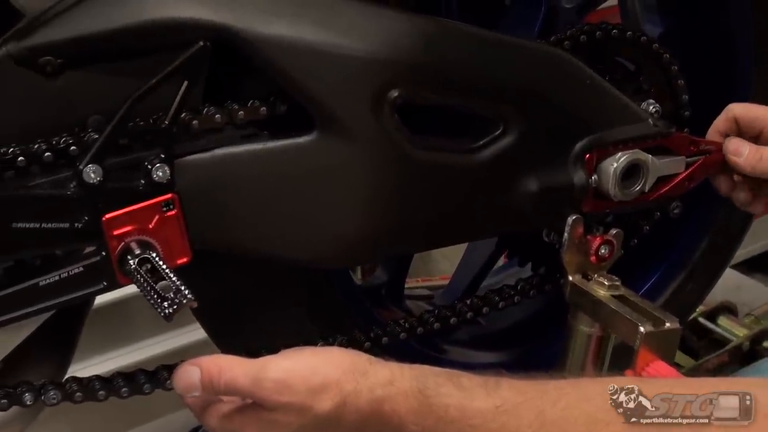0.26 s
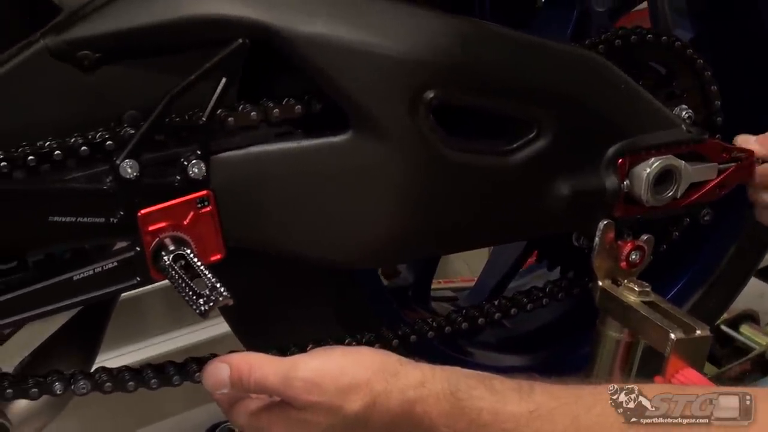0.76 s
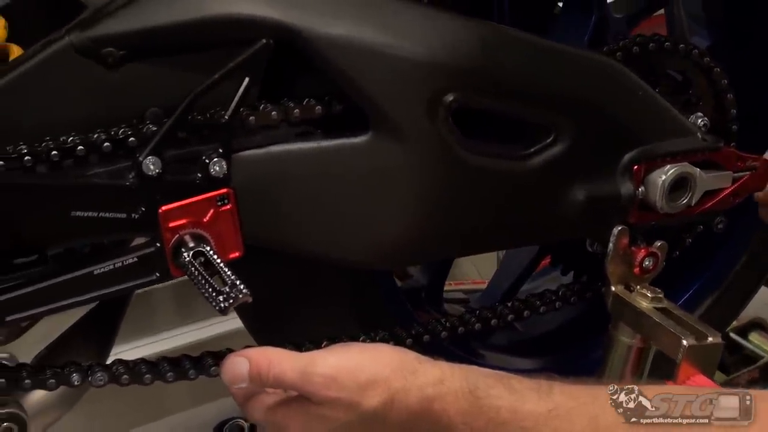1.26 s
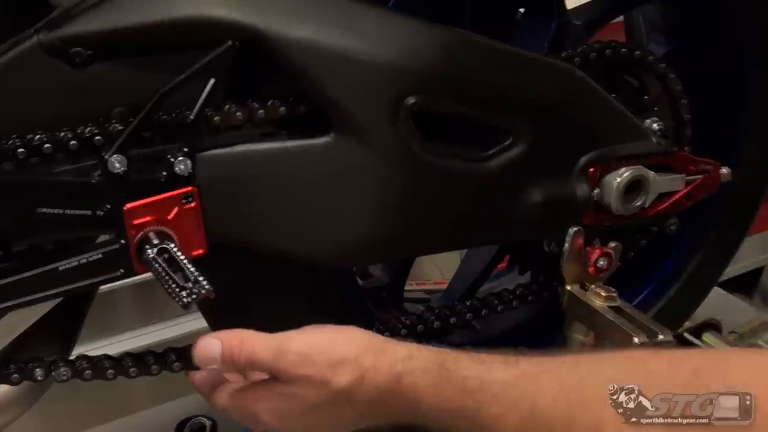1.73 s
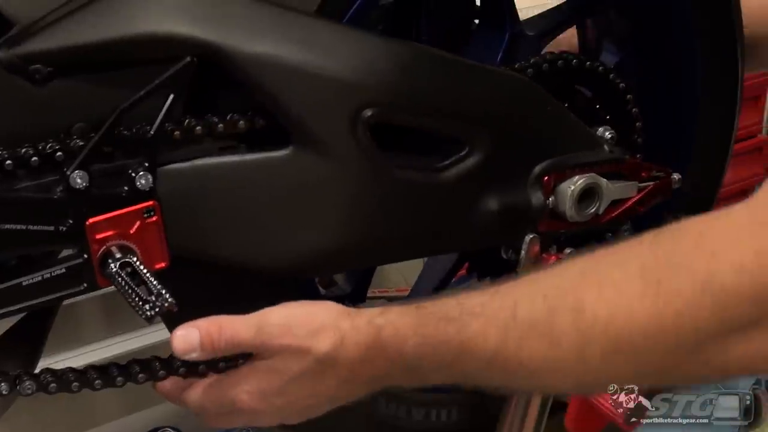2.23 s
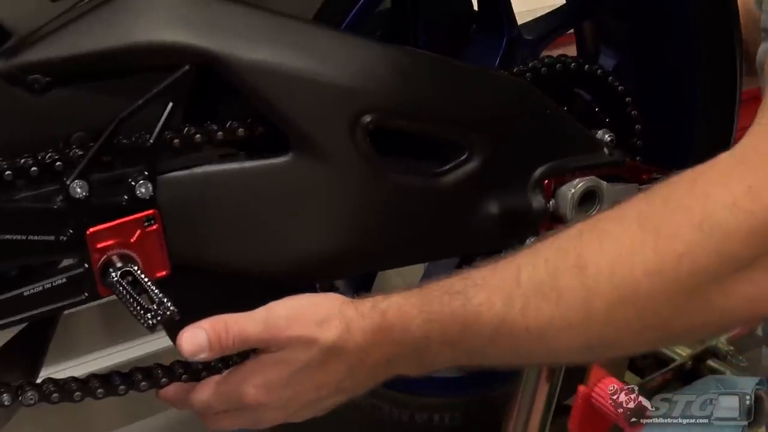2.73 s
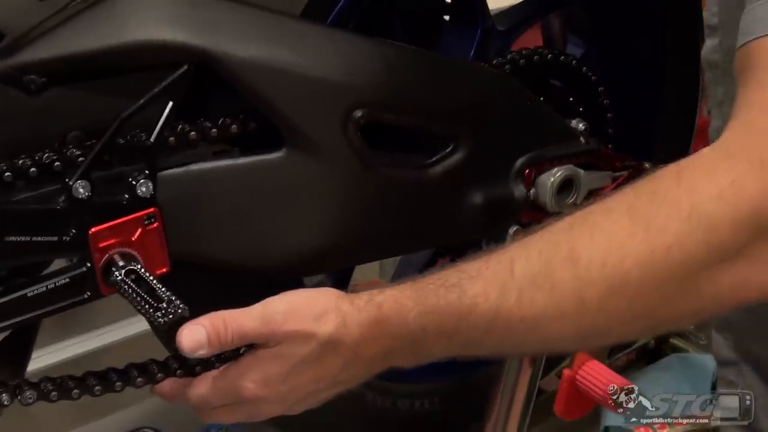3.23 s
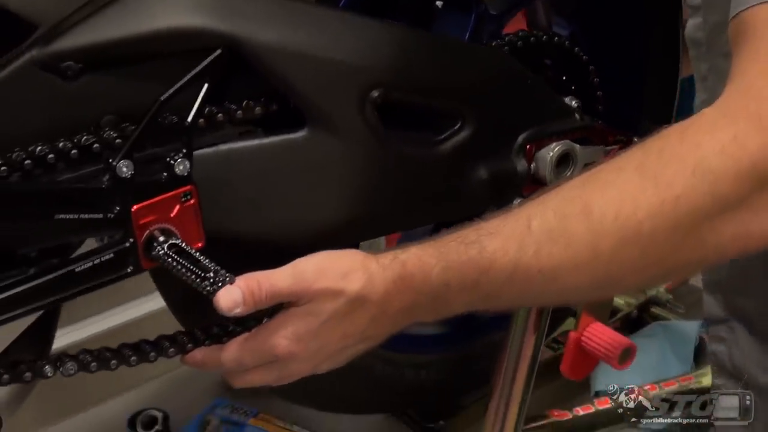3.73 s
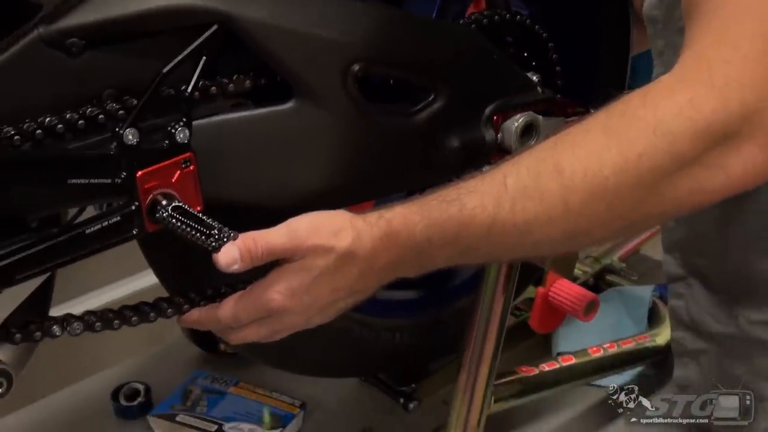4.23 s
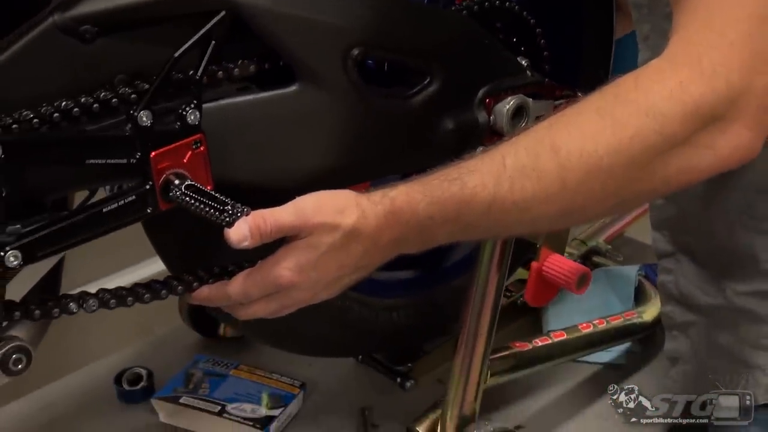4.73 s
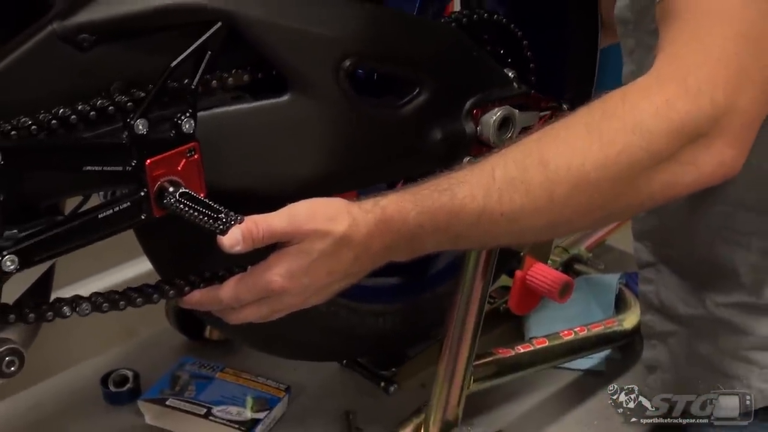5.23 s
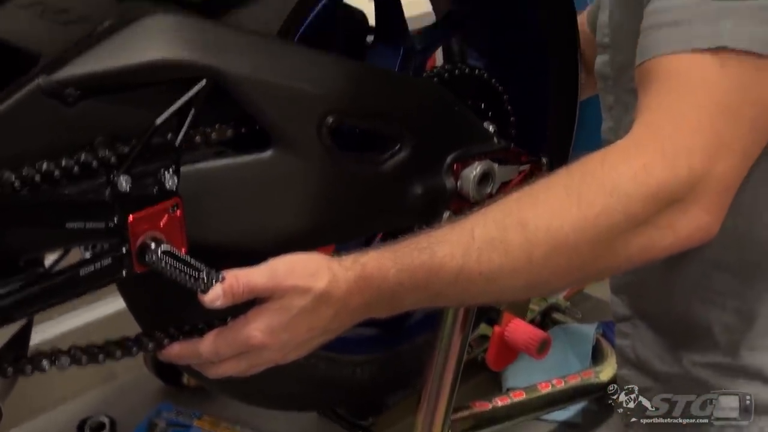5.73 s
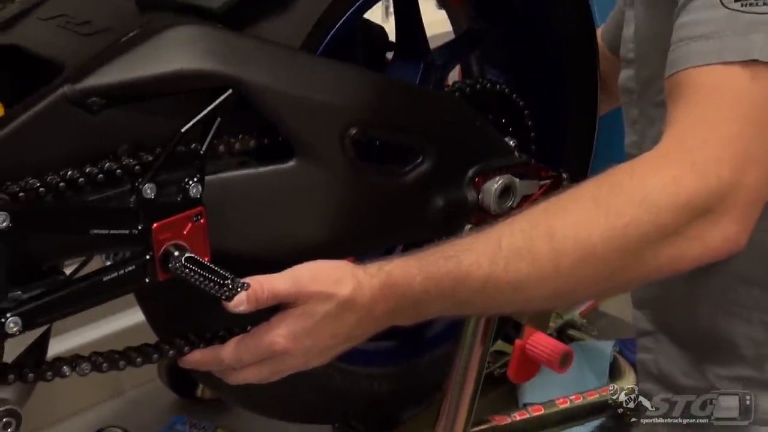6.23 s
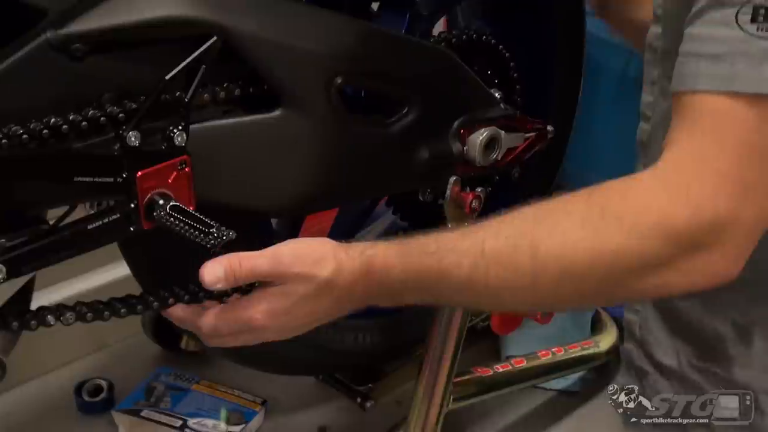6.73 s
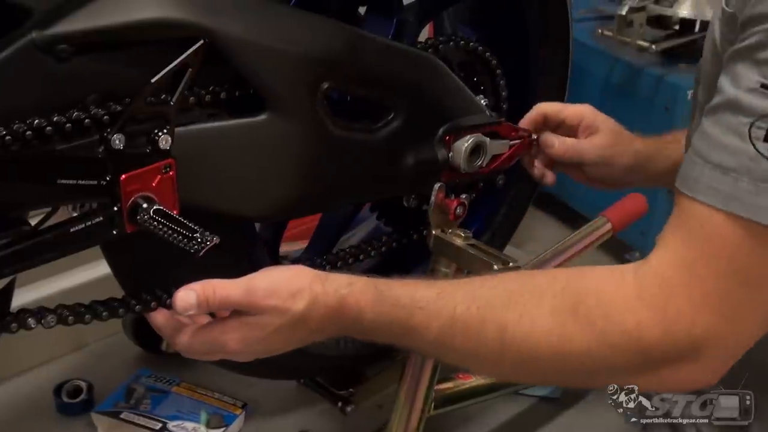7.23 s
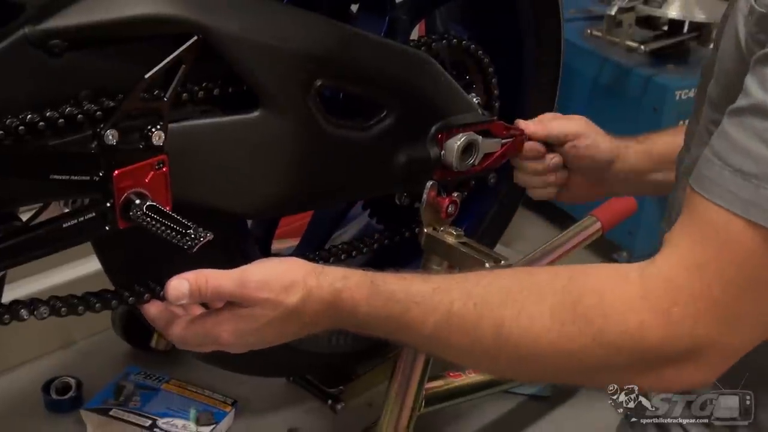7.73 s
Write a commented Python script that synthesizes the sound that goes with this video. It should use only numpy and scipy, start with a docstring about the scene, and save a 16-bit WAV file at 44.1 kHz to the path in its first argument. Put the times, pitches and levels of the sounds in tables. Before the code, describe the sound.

Close up in a reverberant workshop, four quick steel clinks sound as a tool strikes a motorcycle's rear axle fitting. After a lull with soft sleeve rustle and shifting links, the drive chain clanks against the swingarm in four pairs, each ringing briefly. The bike thuds softly on its stand now and then. Three lighter taps on a nut come last, over a faint, steady hum and ventilation rumble.

```python
"""A motorcycle drive chain is checked for slack in a workshop, close up and nearly mono.
First a steel tool clinks four times at the axle adjuster, one blow shoving the swingarm. A hand and
sleeve brush along the chain and links shift softly. Then the chain is pushed up and slaps the swingarm
in four pairs, and three lighter clinks on the lock nut close the scene. The hard room rings after each
blow; now and then the bike bumps on its stand, over ventilation rumble and a faint mains hum."""
import sys
import numpy as np
from scipy import signal
from scipy.fft import rfft, irfft, next_fast_len
from scipy.io import wavfile
from scipy.ndimage import uniform_filter1d, map_coordinates

SR = 44100
rng = np.random.default_rng(int(sys.argv[2]) if len(sys.argv) > 2 else 0)


def master_out(mix):
    """Clip the mix to full scale and print it as 16-bit PCM to the path in sys.argv[1]."""
    frames = np.transpose(np.atleast_2d(mix))
    ceiling = np.clip(frames, -1, 1)
    pcm = np.round(ceiling * 32767).astype(np.int16)
    wavfile.write(sys.argv[1], SR, pcm)


N = 351477

# EQ of a chain contact: (frequency [Hz], gain [dB])
CHAIN_COLOUR = [(150, -25.5), (400, -18.5), (520, -22), (700, -12), (1250, -15), (1700, -6), (2100, -10.5),
                (3150, 2.5), (4000, -7.5), (5500, -15), (8500, -15.5), (12500, -13), (14000, -20),
                (16000, -26)]
# clusters of lasting modes in the chain: (centre [Hz], width [Hz], level [dB], t60 [s])
CHAIN_MODES = [(1096, 97, -7, 1.1), (1714, 200, -1.5, 1.2), (2500, 200, -5.5, 0.43), (2822, 80, -8, 0.52),
               (3310, 55, -1, 1.3), (3620, 66, -1, .9), (4136, 200, -6.5, 0.46), (5000, 260, -6, 0.39),
               (6370, 450, -8, .9), (9300, 300, -15, .5), (11350, 120, -15.5, .5)]


def chain_slaps():
    """The slack chain hits the swingarm: links land one after another, so each slap swells, then dies."""
    # (time [s], level [dB], body [dB], treble [dB], ring [dB], favoured pitch [Hz], contact [s])
    slaps = [(3.5402, -19.5, -1.5, 0.5, -16.5, 3500, 0.0031), (3.7308, -20, 0.5, 1.5, -16, 3300, 0.0015),
             (4.4888, -23, 1, 4, -8.5, 3360, 0.0023), (4.5523, -26, 3, 5.5, -11.5, 1748, .0017),
             (5.3110, -20.5, 2.5, 1, -9.5, 2520, 0.0031), (5.5004, -19.5, -1.5, -1.5, -17, 4300, 0.0016),
             (6.0925, -22, 0, 3, -12, 6660, 0.0039), (6.1992, -19, 1.5, 0, -17, 6670, .0023)]
    return steel_hits(slaps, CHAIN_COLOUR, CHAIN_MODES, clash_t60=0.083, crack=0.42, crack_s=0.0035,
                      ping=2.7, ping_s=0.025, favour_db=10.5, spot_db=5, room_db=-9, ripple_db=3)


def adjuster_taps():
    """A steel tool lands hard on the axle adjuster: a sharp crack and a short ring."""
    # (time [s], level [dB], body [dB], treble [dB], ring [dB], favoured pitch [Hz])
    taps = [(.6106, -22, -6, 0.5, -9, 4100), (0.7727, -23, 1.5, 2, -8, 4100),
            (0.844, -19.5, -8.5, -3, -19.5, 3000), (0.957, -20.5, -3.5, -2, -20, 1700)]
    # EQ of the contact: (frequency [Hz], gain [dB])
    colour = [(150, -21.5), (420, -25.5), (850, -22), (1650, -6), (2000, -12.5), (3050, -1), (3700, -6),
              (4200, -8.5), (5400, -17.5), (6700, -7), (8000, -16), (10500, -14.5), (13000, -7.5),
              (16000, -18)]
    # the adjuster's mode clusters: (centre [Hz], width [Hz], level [dB], t60 [s])
    modes = [(430.5, 80, -9.5, 0.41), (1153, 40, -0.5, 0.29), (1660, 110, -10, 0.5), (2116, 180, -4.5, .4),
             (2350, 120, -11.5, 0.59), (3340, 21, 2.5, .2), (4120, 65, -2, 0.38), (4380, 140, -9.5, .6),
             (5000, 71, -9, .4), (6830, 120, -10.5, .5), (8700, 200, -15, .4), (13300, 200, -16, .4)]
    contact_s = 0.00012
    hits = [(*tap, contact_s) for tap in taps]
    return steel_hits(hits, colour, modes, clash_t60=0.046, crack=1.3, crack_s=0.00034,
                      ping=4, ping_s=0.015, favour_db=7, spot_db=5, room_db=-15, ripple_db=3)


def nut_taps():
    """The tool clinks on the lock nut, always at one spot, so each tap favours the same pitch."""
    # (time [s], level [dB], body [dB], treble [dB])
    taps = [(7.5939, -25, 0.5, -3), (7.7176, -25.5, 1, 1.5), (7.92, -25, 1.5, 0)]
    # EQ of the contact: (frequency [Hz], gain [dB])
    colour = [(150, -31), (420, -28), (750, -32), (1350, -22), (1720, 0), (2100, -12), (3100, -12.5),
              (4150, -8.5), (5600, -13.5), (8000, -11.5), (10500, -11.5), (13000, -10.5), (16000, -19)]
    # the nut's mode clusters: (centre [Hz], width [Hz], level [dB], t60 [s])
    modes = [(1134, 12, -6, 0.47), (1870, 90, -5, 0.42), (3490, 170, -3, 0.28), (4100, 90, -8, 0.38),
             (4260, 120, -9, 0.34), (8400, 150, -13, 0.32), (13330, 120, -12, 0.39)]
    ring_db, favoured_hz, contact_s = -13.5, 1850, 0.00012
    hits = [(*tap, ring_db, favoured_hz, contact_s) for tap in taps]
    return steel_hits(hits, colour, modes, clash_t60=0.049, crack=0.98, crack_s=0.001,
                      ping=3, ping_s=0.032, favour_db=1.5, spot_db=1, room_db=-12.5, ripple_db=2.5)


def link_nudges():
    """Links and fingers shift: soft contacts that barely wake the chain's ring."""
    # (time [s], level [dB], body [dB], treble [dB], contact [s])
    nudges = [(.350, -69.5, 8, -7, 0.0064), (.574, -48.5, 6.5, -8, 0.021), (1.995, -58, 22, 4, .018),
              (2.418, -54.5, 22.5, -10, .012), (2.754, -61.5, 15.5, -10, .0016),
              (3.399, -38.5, 17.5, -6, .0043), (6.293, -40, 5, -13.5, .0045), (7.540, -55.5, 11, -7, 0.032)]
    ring_db, favoured_hz = -23, 1070
    hits = [(*nudge, ring_db, favoured_hz, contact_s) for *nudge, contact_s in nudges]
    return steel_hits(hits, CHAIN_COLOUR, CHAIN_MODES, clash_t60=0.11, crack=0.1, crack_s=0.002,
                      ping=1.5, ping_s=0.01, favour_db=4, spot_db=4.5, room_db=-5, ripple_db=2)


def steel_hits(hits, colour, modes, clash_t60, crack, crack_s, ping, ping_s,
               favour_db, spot_db, room_db, ripple_db):
    """Steel on steel: a crack, a clash of dense, quickly damped modes, a lasting ring and the room."""
    track, t = np.zeros(N), np.arange(SR) / SR
    clash_t, hz = t[:SR // 8], np.fft.rfftfreq(2048, 1 / SR)
    level_s, spot_octaves = 0.02, 0.07  # a hit's level is its clash energy spread over level_s
    centre, width, mode_db, t60 = np.transpose(modes)[:, :, None]
    # close modes in a cluster beat against each other as they fade
    bands = 1 / (1 + (2 * (np.fft.rfftfreq(SR, 1 / SR) - centre) / width) ** 2)
    clusters = [unit(c) for c in irfft(rfft(rng.standard_normal(SR)) * bands, SR)]
    # at the blow they all start in step: a clean, brief ping
    pings = ping * np.sin(2 * np.pi * centre * t) * np.exp(-t / ping_s)
    decays = amp(mode_db - 60 * t / t60) * (1 - np.exp(-t / 0.003))
    for s, db, body_db, treble_db, ring_db, favoured_hz, contact_s in hits:
        attack = np.minimum(clash_t / contact_s, 1)
        after = np.maximum(clash_t - contact_s, 0)
        envelope = attack * (amp(-60 * after / clash_t60) + crack * np.exp(-after / crack_s))
        shelves = [(1300, body_db), (2600, 0), (4300, 0), (7000, treble_db)]
        timbre_db = along(colour, hz) + along(shelves, hz)
        # each place of contact ripples the room's EQ, lifts nearby modes and puts a peak in the clash
        ripple = ripple_db * unit(uniform_filter1d(rng.standard_normal(len(hz)), size=5))
        favour = amp(favour_db * np.exp(-2 * np.log2(centre / favoured_hz) ** 2))
        spot = spot_db * np.exp(-(np.log2((hz + 1) / favoured_hz) / spot_octaves) ** 2)
        burst = envelope * rng.standard_normal(len(clash_t))
        clash = signal.fftconvolve(burst, causal(amp(timbre_db + spot)))
        room = signal.fftconvolve(room_tail(), causal(amp(timbre_db + ripple)))
        ring = sum(gain * decay * (onset + np.roll(cluster, rng.integers(SR)))
                   for gain, decay, onset, cluster in zip(favour, decays, pings, clusters))
        for part, part_db in [(clash, 0), (ring, ring_db), (room, room_db)]:
            add(track, s, amp(db + part_db) * part * np.sqrt(level_s * SR) / np.linalg.norm(part))
    return track


def room_tail():
    """The hard workshop answers a blow: fresh noise that dies band by band, the mids lasting longest."""
    # reverb time: (frequency [Hz], t60 [s])
    decay = [(200, 0.47), (800, 1.18), (2000, 1.28), (3500, 1.29), (7000, 0.93), (11000, 0.56),
             (15000, 0.6)]
    # reverb EQ: (frequency [Hz], gain [dB])
    colour = [(100, 2), (420, 11.5), (700, -1.5), (1100, 1.5), (1700, 0), (2300, 3.5), (3100, -1),
              (4700, 5), (5600, 0), (7000, 0), (12500, -2), (14500, -7.5)]
    hz, t, noise = signal.stft(rng.standard_normal(SR), SR, nperseg=256)
    fade = amp(along(colour, hz)[:, None] - 60 * t / along(decay, hz)[:, None])
    build_up = 1 - np.exp(-t / 0.004)
    return signal.istft(noise * fade * build_up, nperseg=256)[1]


def swingarm_knock(s, db, push_s, right_db):
    """The hardest tap also shoves the swingarm: one dull push, a little to the right."""
    track, progress = np.zeros(N), np.arange(SR // 4) / SR / push_s
    add(track, s, amp(db) * (1 - progress) * np.exp(-progress))
    return track * amp([[-right_db / 2], [right_db / 2]])


def stand_thuds():
    """The bike rocks on its stand: low, damped swings."""
    # (time [s], level [dB], pitch [Hz], t60 [s])
    bumps = [(0.843, -34, 70, 0.1), (1.559, -40.5, 36.3, 0.44), (2.41, -38, 47.6, 0.13),
             (5.308, -36.5, 38.4, 0.66), (5.409, -33, 41, 0.36), (6.16, -43, 53.5, 0.6),
             (6.459, -33.5, 33.2, 0.38)]
    track, t = np.zeros(N), np.arange(SR // 2) / SR
    attack = 1 - np.exp(-t / 0.0038)
    for s, db, hz, t60 in bumps:
        add(track, s, amp(db - 60 * t / t60) * np.sin(2 * np.pi * hz * t) * attack)
    return track


def hand_rustle():
    """Each stroke of hand and sleeve swells and fades; a resting hand still rustles faintly."""
    # brushes along the chain: (time of peak [s], level [dB], length [s])
    strokes = [(2.04, -63.5, 0.14), (2.395, -61.5, 0.38), (3.05, -64.5, 0.46), (3.451, -72.5, .4),
               (7.896, -66, 0.73)]
    # cloth noise spectrum: (frequency [Hz], level [dB])
    cloth = [(60, -25), (130, -5), (250, -6), (500, -12.5), (800, -13.5), (1300, -17), (1900, -20.5),
             (3600, -22), (6000, -36.5), (14000, -43.5)]
    t = np.arange(N) / SR
    resting_db, flutter_db = -74, 2.5
    stroke_power = sum(amp(db) ** 2 * np.exp(-(2 * (t - s) / length_s) ** 2)
                       for s, db, length_s in strokes)
    flutter = amp(flutter_db * wobble(rate=25))
    return np.sqrt(amp(resting_db) ** 2 + stroke_power) * flutter * hiss(cloth)


def room_tone():
    """Ventilation rumble and a slightly unsteady mains hum, a little wide in the bass."""
    # mains hum: (frequency [Hz], level [dB])
    partials = [(59.5, -65), (120, -71), (162, -73.5)]
    # ventilation noise spectrum: (frequency [Hz], level [dB])
    ventilation = [(12, -32.5), (20, 3), (70, -2), (91, -21), (163, -13.5), (193, -24.5), (347, -25),
                   (399, -26), (949, -30), (1030, -35.5), (1260, -31.5), (1530, -39.5), (13500, -41),
                   (16000, -46)]
    t = np.arange(N) / SR
    hum = sum(amp(db) * np.sqrt(2) * np.sin(2 * np.pi * hz * t + 0.42 * wobble(rate=2.8))
              for hz, db in partials)
    air = amp(-55 + 0.83 * wobble(rate=5.4)) * hiss(ventilation)
    side = amp(-74.5) * hiss([(30, -8.5), (160, -21), (500, -20.5), (2000, -30.5), (15000, -21.5)])
    return air + hum + np.array([side, -side])


def amp(db):
    """Decibels to gain."""
    return 10 ** (np.asarray(db) / 20)


def unit(x):
    """Scale to rms 1."""
    return x / np.sqrt(np.mean(x ** 2) + 1e-20)


def along(points, hz):
    """Read a curve of (frequency [Hz], value) points on a log axis."""
    freqs, values = np.transpose(points)
    return np.interp(np.log(hz + 1), np.log(freqs + 1), values)


def wobble(rate):
    """A smooth random curve with `rate` knots a second."""
    return map_coordinates(rng.standard_normal(int(N * rate / SR) + 4), [np.arange(N) * rate / SR])


def filtered(x, response):
    """Zero-phase EQ; `response` gives the gain at each frequency."""
    size = next_fast_len(N + SR // 2)
    return irfft(rfft(x, size) * response(np.fft.rfftfreq(size, 1 / SR)), size)[..., :N]


def hiss(spectrum):
    """Noise of rms 1, shaped by (frequency [Hz], level [dB]) points."""
    return unit(filtered(rng.standard_normal(N), lambda hz: amp(along(spectrum, hz))))


def causal(gain):
    """Minimum-phase impulse response for gains from 0 Hz to SR / 2: nothing sounds before the blow."""
    cepstrum = irfft(np.log(gain))
    half = len(cepstrum) // 2
    cepstrum[1:half] *= 2
    cepstrum[half + 1:] = 0
    return irfft(np.exp(rfft(cepstrum)))


def add(track, s, sound):
    """Mix a sound into the track at s seconds."""
    start = max(round(s * SR), 0)
    track[start:start + len(sound)] += sound[:max(N - start, 0)]


def scene():
    """The handling sits dead centre; only the knock and the room tone give any width."""
    steel = adjuster_taps() + chain_slaps() + nut_taps() + link_nudges()
    bumps = stand_thuds() + swingarm_knock(s=0.8445, db=-21.5, push_s=0.0047, right_db=6)
    return steel + bumps + hand_rustle() + room_tone()


def record(dry):
    """A brick-wall low-pass trims the very top of the treble."""
    cutoff_hz = 15900
    return filtered(dry, lambda hz: 1 / np.sqrt(1 + (hz / cutoff_hz) ** 160))


dry = scene()
out = record(dry)
master_out(out)
```